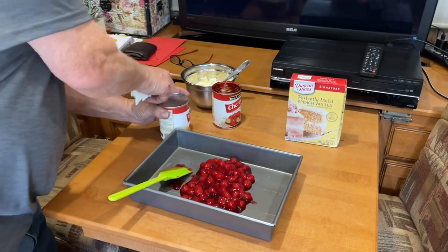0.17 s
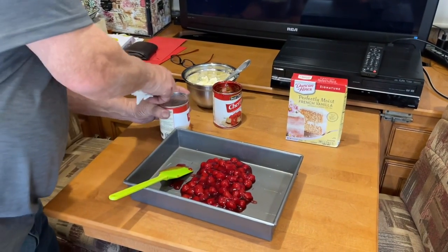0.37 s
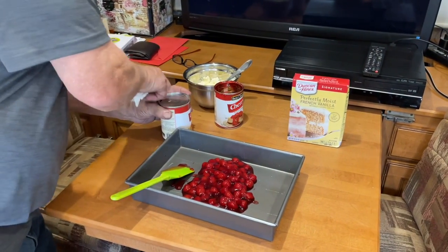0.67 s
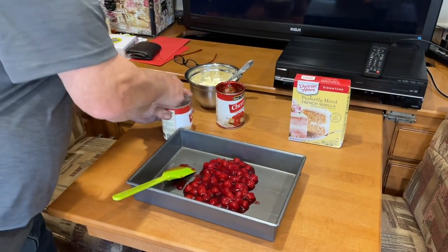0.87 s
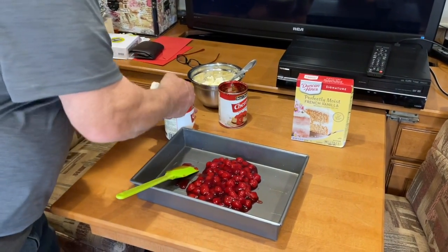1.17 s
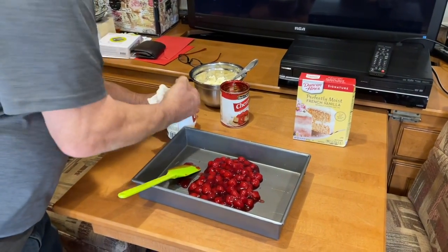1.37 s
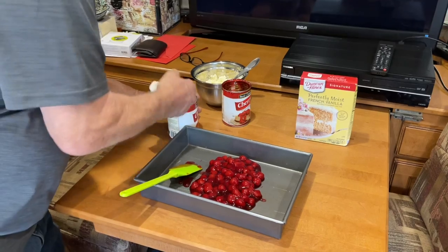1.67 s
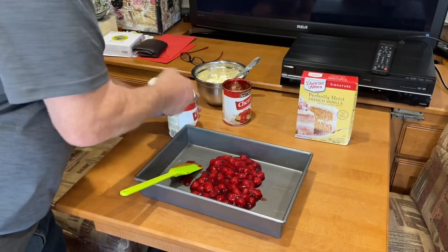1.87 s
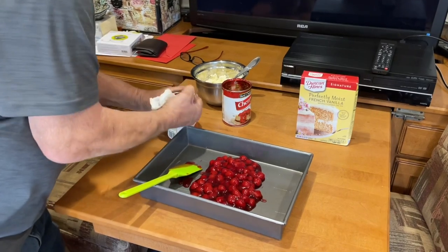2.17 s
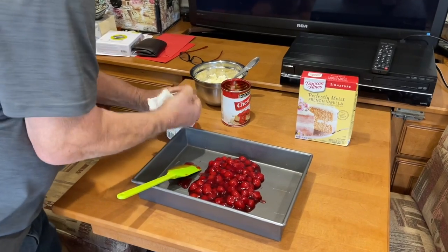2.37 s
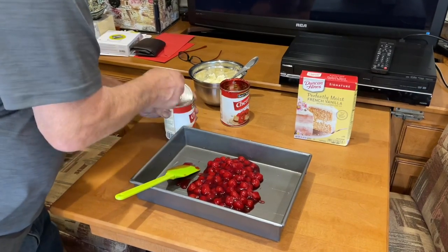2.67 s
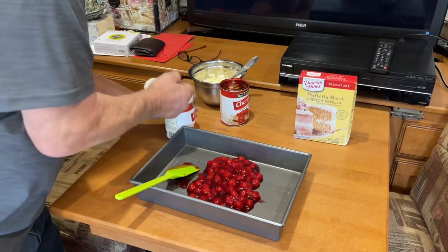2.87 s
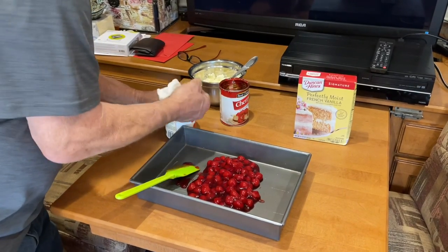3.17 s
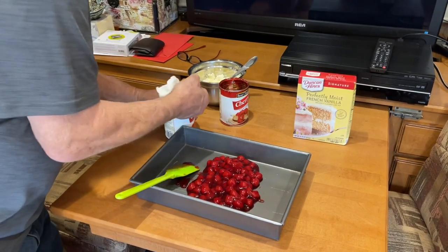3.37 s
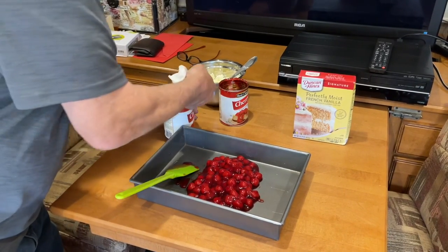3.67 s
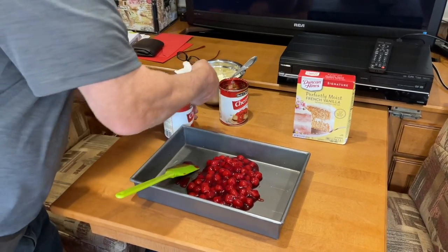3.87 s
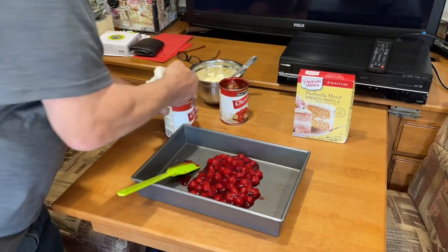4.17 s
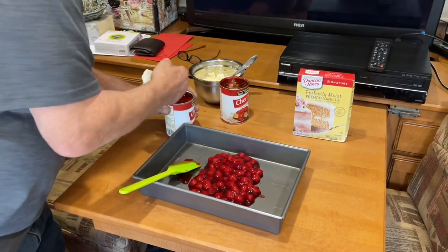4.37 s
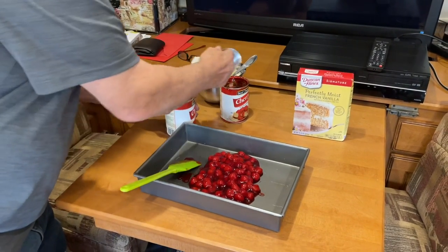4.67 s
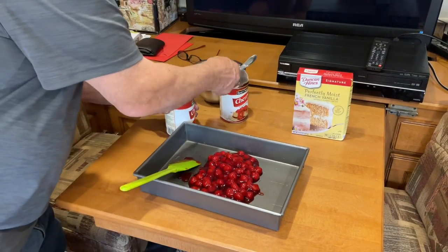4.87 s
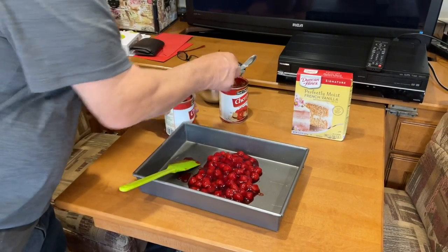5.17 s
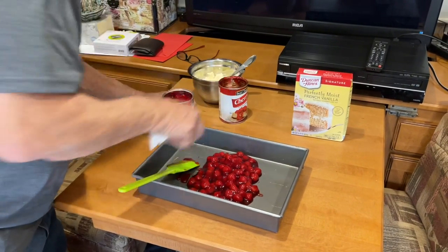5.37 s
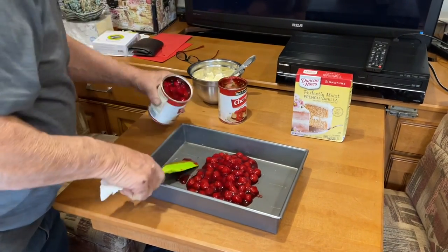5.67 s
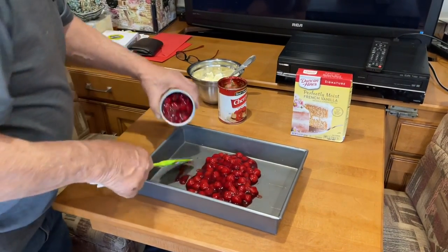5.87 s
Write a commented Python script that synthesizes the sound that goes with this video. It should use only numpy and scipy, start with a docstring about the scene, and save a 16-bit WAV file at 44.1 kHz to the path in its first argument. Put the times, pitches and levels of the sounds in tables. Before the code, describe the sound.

Close tin knocks, rubs and ticks at a wooden table; a lid drops onto another can, with low hum in a quiet kitchen.

```python
"""A quiet kitchen: hands at a wooden table work the lid off a full metal can, close to a pair of microphone ports.
Knocks ring the tin's modes near two touched spots; dense random slips make the rubbing and creaks.
The lid snaps free and drops on another can, then a spatula is lifted from a baking pan; noise bursts add cracks.
Sparse echoes answer the work. Behind lie a slow machine's wavering hum and filtered-noise room tone."""
import sys
import numpy as np
from scipy import signal
from scipy.fft import rfft, irfft, next_fast_len
from scipy.io import wavfile

SR = 44100
rng = np.random.default_rng(int(sys.argv[2]) if len(sys.argv) > 2 else 0)


def invert_db(x):
    """Field ratio 10**(x/20) for x, a level in decibels (scalar or array-like)."""
    u = np.asarray(x, float) / 20
    return 10 ** u


def dump_mix(stems):
    """Bounce the given channels to the path in sys.argv[1] as a 16-bit WAV at rate SR."""
    frames = np.atleast_2d(stems).T  # one column per channel
    limited = np.clip(frames, -1, 1)  # hard clip at full scale
    pcm = np.round(limited * 32767).astype(np.int16)
    wavfile.write(sys.argv[1], SR, pcm)


N = 265923

# can and lid modes: pitch_hz, relative_level_db, t60_s (before the grip shortens it)
TIN_MODES = [(269, 0, .08), (370, -8, .05), (480, -4, .06), (549, -2, .055), (610, 0, .06), (662, 0, .05),
             (750, -3, .06), (885, -3, .07), (1010, -6, .05), (1220, -3, .06), (1290, -4, .07),
             (1410, -2, .06), (1520, -5, .05), (1640, -2, .055), (1950, -4, .05), (2260, -4, .05),
             (2450, -3, .045), (2650, -2, .05), (2900, -4, .05), (3190, -6, .04), (3470, -5, .04),
             (3950, -6, .04), (4200, -5, .04), (4450, -3, .03), (4650, -2, .035), (4850, -4, .03),
             (6340, -4, .05), (7150, -6, .05)]
# spectra: pitch_hz, relative_level_db
TABLE_THUD = [(100, -41.5), (200, -1), (300, 2), (600, 0), (1000, -0.5), (2000, -48.5)]  # table top
GRIT_COLOUR = [(300, -33), (800, -19), (1500, -0.5), (2500, -7), (4000, -14), (7000, -23.5)]  # broad middle of friction
HISS_COLOUR = [(1500, -20.5), (3500, 17), (6500, 18), (9000, -2), (12000, 7.5)]  # fine top of friction
CRACK_COLOUR = [(1000, -2), (2500, -1.5), (4500, 1.5), (7000, -2), (9000, -1), (12000, 2)]  # sharp part of knocks, and ticks
PAPER_COLOUR = [(2000, -10), (5000, -6), (7500, -8), (9000, -3.5), (12000, -2)]  # paper towel

# knocks of can, lid and spatula: time_s, strength_db (relative), high_over_low_ring_db, low_spot_hz, high_spot_hz
KNOCKS = [(0.001, -44, 4, 454, 1860), (0.049, -53.5, 7, 480, 1940), (0.335, -46, -0.5, 880, 2200),
          (0.348, -28, -6, 1004, 1420), (0.553, -33.5, -3, 580, 1620), (0.894, -45, 8.5, 832, 2240),
          (0.918, -36.5, 2, 750, 1380), (1.432, -65.5, 22.5, 710, 2260), (1.546, -72.5, 14.5, 800, 2430),
          (1.62, -65, -10, 990, 1400), (1.655, -62, -16, 990, 1400), (1.759, -77, 9, 800, 1400),
          (1.867, -35, -1, 472, 2900), (1.872, -40, 5.5, 480, 1250), (1.948, -30, -7, 437, 1290),
          (1.968, -28, -33, 390, 1300), (1.985, -41, 1, 494, 1350), (2.033, -37.5, -16, 504, 1220),
          (2.186, -54, 2.5, 510, 1370), (2.228, -39.5, -7.5, 500, 1280), (2.247, -36.5, 2.5, 560, 2900),
          (2.251, -24, -4.5, 586, 1210), (2.38, -42, -13, 600, 1400), (2.439, -43.5, -14, 590, 1400),
          (2.489, -35, -18, 590, 1350), (2.714, -38, -8, 510, 1250), (2.785, -70, 14, 510, 2260),
          (2.918, -30.5, -39, 294, 990), (2.974, -25.5, -7, 680, 1900), (2.995, -30, -5.5, 494, 1200),
          (3.075, -39.5, 3.5, 950, 2920), (3.096, -40.5, 7.5, 970, 2750), (3.109, -41.5, 2, 990, 2750),
          (3.088, -41.5, 6, 1000, 4200), (3.153, -28, -9, 890, 2200), (3.417, -63.5, 6.5, 660, 2400),
          (3.451, -52, 11.5, 910, 1820), (3.488, -40, 2, 1000, 1880), (3.551, -37.5, -7, 604, 1660),
          (3.573, -33.5, -1, 560, 1780), (3.652, -33.5, -9, 506, 1670), (3.681, -41, -8, 557, 1690),
          (3.705, -35, -2, 750, 1310), (3.871, -44.5, 2, 614, 1232), (3.888, -37.5, -1, 600, 2700),
          (3.897, -46, -9, 557, 1640), (4.036, -26.5, 6, 694, 2536), (4.801, -19, -22.5, 474, 1270),
          (4.813, -29.5, 0, 838, 1200), (4.902, -12, -26, 650, 1192), (4.921, -26, 14.5, 603, 4525),
          (4.923, -28, 5, 588, 1680), (4.926, -35, 9, 605, 4700), (4.944, -25, -6.5, 600, 1220),
          (4.958, -17.5, -22.5, 600, 1220), (4.975, -43, -11, 560, 1680), (5.006, -19, -6.5, 783, 1647),
          (5.0415, -20.5, -1, 880, 3190), (5.141, -35.5, -6.5, 705, 4250), (5.172, -56.5, 14, 675, 2030),
          (5.258, -40.5, -8, 475, 1260), (5.403, -21, -26, 690, 1190), (5.411, -16.5, -22.5, 677, 1170),
          (5.557, -37.5, 0, 955, 2450), (5.587, -35, 2.3, 990, 2434), (5.713, -38, -12.5, 465, 1217)]
USUAL_DB = -31  # reference strength of knocks and rubs
LOW_FOCUS_DB, HIGH_FOCUS_DB = 50, 65  # modes lose this per octave away from the knocked spot
DETUNE = 0.012  # standard deviation, as a fraction of pitch
EVEN_CONTACT_MS, LONGER_MS_PER_DB = 2.44, 0.5978  # contact at equal rings; duller blows touch longer
CRACK_DB, CRACK_GROWTH = -13.5, 0.31  # crack peak over high strength at USUAL_DB; extra dB per dB
THUD_DB_PER_OCTAVE = 6  # blows on a higher low spot give more thud
THUD_GROWTH = -0.32  # hard blows put less of their strength into the table, dB per dB
DULL_DB_PER_OCTAVE = -10.5  # a blow's grit fades from an octave above its high spot

# long drag around the lid: time_s, pressure_db, extra_low_ring_db, low_spot_hz, high_spot_hz
DRAG = [(0.885, -84, -9, 700, 1560), (0.896, -45, -40, 740, 1360), (0.92, -33, -58, 700, 1340),
        (0.955, -28, -3, 624, 1385), (0.985, -33.5, 3, 580, 1510), (1.028, -42.5, 1, 645, 1820),
        (1.08, -34.5, 4, 740, 1240), (1.13, -42.5, -0.5, 770, 1500), (1.19, -51.5, 2, 660, 1390),
        (1.23, -44, -3, 740, 1510), (1.26, -39, -2, 810, 1490), (1.28, -39.5, 4.5, 894, 1380),
        (1.31, -39.5, 0.5, 800, 1410), (1.328, -44.5, -2, 830, 2480), (1.35, -59, 10.5, 760, 2120),
        (1.39, -59.5, 0, 770, 2370), (1.444, -69, 7, 700, 2240), (1.5, -72, -12, 590, 1940)]
# short rubs on the tin: start_s, hold_s, pressure_db, low_spot_hz, high_spot_hz
RUBS = [(0.029, 0.026, -40.5, 348, 1760), (0.344, 0.042, -57.5, 770, 1296), (1.844, 0.11, -56, 422, 1334),
        (2.684, 0.065, -61.5, 533, 1270), (2.926, 0.04, -61, 320, 990), (2.979, 0.013, -43.5, 526, 1540),
        (3.057, 0.08, -45, 940, 3000), (3.444, 0.125, -50.5, 1250, 1990), (3.65, 0.063, -51.5, 580, 1320),
        (3.77, 0.029, -62, 604, 1520), (3.828, 0.043, -55.5, 600, 1000), (3.869, 0.03, -46, 567, 1640),
        (4.022, 0.028, -51.5, 697, 2520), (4.843, 0.034, -53.5, 630, 1630), (4.894, 0.043, -50, 619, 1560),
        (5.042, 0.1, -50, 626, 1593), (5.378, 0.051, -59, 613, 1259), (5.549, 0.065, -59.5, 792, 1753),
        (5.896, 0.06, -72, 600, 2580)]
# faint fumbling of the hands throughout: time_s, pressure_db
FUMBLE = [(0, -58.5), (0.14, -60), (0.3, -80), (0.62, -70.5), (0.87, -61.5), (1.6, -78.5), (1.8, -73.5),
          (2.15, -68), (2.6, -78.5), (2.9, -62), (3.28, -99), (3.4, -83), (4.0, -76.5), (4.2, -90.5),
          (4.6, -108), (4.8, -79.5), (5.3, -71), (5.5, -68.5), (5.7, -73.5), (6.03, -76)]
# rustles of the paper towel: start_s, hold_s, level_db
RUSTLES = [(0.032, 0.0035, -29.5), (0.213, 0.028, -62), (1.875, 0.014, -50), (2.068, 0.025, -63),
           (2.618, 0.022, -67), (2.77, 0.021, -59.5), (2.815, 0.17, -87), (2.98, 0.019, -49),
           (3.321, 0.029, -66.5), (4.641, 0.059, -67), (4.944, 0.17, -41), (5.142, 0.017, -39.5),
           (5.257, 0.35, -63.5), (5.729, 0.045, -63), (5.92, 0.055, -63)]
FUMBLE_WOBBLE_DB = 2  # rms; the faint handling comes and goes
RISE_DB_PER_S, FALL_DB_PER_S = 1505, 304.5  # rubs and rustles
LOW_DB, LOW_GROWTH = -3.5, 0.83  # low ring strength over USUAL_DB, and dB per dB of pressure
HISS_DB, HISS_GROWTH = -10, 1.9  # the same for hiss
# the long drag has less rumble and hiss than the short rubs, a trace more grit and more tone
DRAG_RUMBLE_DB, DRAG_GRIT_DB, DRAG_HISS_DB, DRAG_TONE_DB = -6.5, 0.5, -16.5, 14

# bright cracks of the knocks, and a few lone ticks: time_s, relative_level_db, tilt_db_per_octave
TICKS = [(0.051, -16.5, 8), (0.347, -45, 2), (0.397, -51, 19), (0.5513, -47.5, 0.5), (0.893, -34.5, -3.5),
         (0.915, -27, 14), (1.259, -38, 15), (1.8663, -35.5, -5), (1.942, -36, 4), (1.986, -44, -9),
         (2.0326, -54, 5), (2.2481, -32, -6), (2.7767, -53, 9), (2.976, -39.5, -6.5), (3.0742, -38.5, -7.5),
         (3.083, -43, 0.5), (3.1608, -37.5, 0), (3.4511, -44.5, -7.5), (3.491, -36, -5),
         (3.5228, -38, -6.5), (3.549, -40.5, -6), (3.5742, -42.5, 0.5), (3.651, -41.5, -8.5),
         (3.683, -51, -12), (3.846, -47, 20), (3.881, -39, -11.5), (4.0362, -15.5, 3.5), (4.8, -40.5, -5),
         (4.9225, -14, 2.5), (5.011, -31, -9.5), (5.0393, -11.5, -4.5), (5.1366, -33, 7), (5.557, -49, -1),
         (5.587, -41.5, -6)]
TICK_MS, TICK_DB = 4.2, 7.5  # decay constant; gain on every one

# the can tips back onto the table: time_s, level_db
CAN_TIPS = [(.794, -22.5), (1.9435, -35), (2.975, -31)]
# the can's base: pitch_hz, relative_level_db, t60_s
CAN_BASE = [(259, -4, 0.081), (557, 6, 0.026), (740, -13, 0.068)]
# the lid lands flat on the other can; a faint repeat follows: time_s, level_db
LID_DROPS = [(5.0405, -5.5), (5.078, -28.5)]
# the can it lands on: pitch_hz, relative_level_db, t60_s
OTHER_CAN = [(269, -16, .06), (487.4, -8.5, 0.054), (646.6, 1.5, 0.02), (880, -18, 0.042),
             (1220, -12, 0.026), (1640, -7, 0.052), (1876, -19, .06)]

# kitchen echoes: pitch_hz, t60_s
ECHO_T60 = [(250, 0.1), (700, 0.15), (2000, 0.15), (5000, 0.18), (11000, 0.17)]
# width of the echoes: pitch_hz, side_over_mid (factor)
ECHO_WIDTH = [(100, 0.33), (600, 0.28), (1500, 1), (5000, 0.77), (7500, 0.69), (8600, .15)]

HUM_HZ, DRONE_HZ = 20.82, 67.8  # mean pitches
# machine hum: multiple of HUM_HZ, level_db (rms)
HUM_ORDERS = [(1, -66.5), (2, -50.5), (3, -60.5), (4, -54.5), (5, -59), (6, -59), (8, -71)]
DRONE_DB = -54.5  # rms; a second, looser tone

# room tone spectrum: pitch_hz, relative_level_db (per Hz)
AIR_COLOUR = [(30, -26.5), (48, -14.5), (62, -8), (110, -13.5), (173, -14.5), (474, -28.5), (1690, -43),
              (2300, -53.5), (8660, -55.5), (11300, -55.5), (12500, -75.5)]
AIR_DB = -56.5  # rms over both sides
# room tone: pitch_hz, left_right_likeness (0 to 1)
AIR_LIKENESS = [(60, 0.38), (250, 0.83), (700, 0.35), (1500, 0.09), (3000, 0.4), (7500, 0.17), (8600, 0.23)]

# the ports turn against each other in the treble, by one and a half cycles: pitch_hz, left_lead_radians
PORT_PHASE = [(0, 0), (1700, .05), (3100, 1), (4500, .5), (7900, .7), (8600, 0), (9300, -1.5),
              (10150, -3.14), (11370, -5.2), (12050, -6.28), (12500, -6.5), (13000, -7.8), (13300, -9.4)]
# steep treble cut of the finished sound, above 12 kHz: pitch_hz, level_db
TREBLE_CUT = [(11500, -1), (12700, -28), (13600, -31), (16000, -36.5)]


def knocks():
    """Each blow swings up the tin's modes near a low and a high spot; its rattling contact adds grit, thud and crack."""
    s, low_db, edge_db, low_hz, high_hz = np.transpose(KNOCKS)
    high_db = low_db + edge_db
    crack_db = high_db + CRACK_DB + CRACK_GROWTH * (high_db - USUAL_DB)
    crack_db += 0.3 * np.minimum(edge_db, 0)  # dull blows crack less
    thud_db = low_db - 9.5 + THUD_DB_PER_OCTAVE * np.log2(low_hz / 500)
    thud_db += THUD_GROWTH * (low_db - USUAL_DB)
    contact_ms = np.maximum(EVEN_CONTACT_MS - LONGER_MS_PER_DB * np.clip(edge_db, -12, 12), 1)

    t = np.arange(3200) / SR
    hz, _, t60 = np.transpose(TIN_MODES)[:, :, None]
    fade = invert_db(-60 * t / (0.65 * t60))  # the grip damps the rings
    mode_size = invert_db(low_db + 5.0) * shares(low_hz, LOW_FOCUS_DB)
    mode_size += invert_db(high_db + 4.0) * shares(high_hz, HIGH_FOCUS_DB)

    out = np.zeros(N + len(t))
    for k, at in enumerate(np.round(np.maximum(s - 0.001, 0) * SR).astype(int)):
        u = t / contact_ms[k] * 1000  # time in lengths of the contact
        # the grip detunes and weights the modes a little differently at every blow
        weight_db, bend = rng.standard_normal((2, len(hz)))
        modes = fade * np.sin(2 * np.pi * hz * (1 + DETUNE * bend[:, None]) * t)
        ring = (mode_size[:, k] * invert_db(weight_db)) @ modes
        ring *= 1 - np.exp(-(1.3 * u) ** 1.8)  # the modes gather energy while the contact lasts
        out[at:at + len(t)] += ring

        contact = np.sqrt(u) * np.exp(-u) * rng.standard_normal(len(t))
        grit = [(f, db + DULL_DB_PER_OCTAVE * max(np.log2(f / high_hz[k] / 2), 0)) for f, db in GRIT_COLOUR]
        noises = (grit, high_db[k] - 3.5), (TABLE_THUD, thud_db[k]), (CRACK_COLOUR, crack_db[k])
        for colour, peak_db in noises:
            noise = coloured(contact, colour)
            out[at:at + len(t)] += invert_db(peak_db) * noise / abs(noise).max()
    return out[:N]


def rubbing():
    """Dense uneven slips ring modes near two moving spots, and add two sliding tones, grit, rumble and hiss."""
    t = np.arange(N) / SR
    coarse = t[::64]

    def fine(curve):
        """A coarse curve at every sample."""
        return np.interp(t, coarse, curve)

    # pressures of the drag, the rubs and the fumbling add as powers
    drag_s, drag_pressure_db, drag_low_db = np.transpose(DRAG)[:3]
    drag_db = np.interp(coarse, drag_s, drag_pressure_db, left=-150, right=-150)
    rub_db = strokes(coarse, *np.transpose(RUBS)[:3])
    fumble_db = np.interp(coarse, *np.transpose(FUMBLE)) + FUMBLE_WOBBLE_DB * wander(3.3, 2.0)
    high_db = 10 * np.log10(invert_db(2 * drag_db) + invert_db(2 * rub_db) + invert_db(2 * fumble_db))
    dragging = invert_db(2 * (drag_db - high_db))  # the drag's share of the pressure
    low_db = USUAL_DB + LOW_DB + LOW_GROWTH * (high_db - USUAL_DB)
    low_db += np.interp(coarse, drag_s, drag_low_db, left=0, right=0)
    hiss_db = USUAL_DB + HISS_DB + HISS_GROWTH * (high_db - USUAL_DB) + DRAG_HISS_DB * dragging
    rustle_db = strokes(coarse, *np.transpose(RUSTLES))

    spots = sorted((row[0], *row[-2:]) for row in DRAG + RUBS)
    s, low_hz, high_hz = np.transpose(spots)
    low_hz, high_hz = np.interp(coarse, s, low_hz), np.interp(coarse, s, high_hz)

    # about 9000 slips a second, of uneven size and random sign
    size = invert_db(2.6 * np.minimum(rng.exponential(1, N), 4)) * rng.choice([-1., 1.], N)
    slips = evened(size * (rng.random(N) < 9000 / SR))

    out = np.zeros(N)
    drive = invert_db(low_db - 15.5) * shares(low_hz, 39.0) + invert_db(high_db - 10.5) * shares(high_hz, 14.65)
    for (hz, _, t60), share in zip(TIN_MODES, drive):
        r = 1000 ** (-1 / (0.7 * t60 * SR))  # the grip damps the rings
        w = 2 * np.pi * hz / SR
        push = slips * fine(share * invert_db(4.5 * wander(34, 5.5)))
        out += signal.lfilter([np.sqrt(2 * (1 - r ** 4)) * np.sin(w)], [1, -2 * r * np.cos(w), r * r], push)

    # the bending lid's own sliding tones
    for hz, db, width_hz in (low_hz, low_db + 7.0, 160), (high_hz, high_db + 3.5, 360):
        tone_db = db + DRAG_TONE_DB * dragging + 0.78 * wander(50, 36)
        out += resonate(slips * fine(invert_db(tone_db)), fine(hz), width_hz)

    noises = ((GRIT_COLOUR, high_db + 10.0 + DRAG_GRIT_DB * dragging),
              (TABLE_THUD, low_db + 12.0 + DRAG_RUMBLE_DB * dragging),
              (HISS_COLOUR, hiss_db), (PAPER_COLOUR, rustle_db))
    for colour, db in noises:
        out += coloured(slips * fine(invert_db(db + 2.5 * wander(120, 20))), colour)
    return out


def ticks():
    """Bright cracks of the knocks and a few lone ticks: very short rattles, some sharper than others."""
    u = np.arange(1500) / SR / TICK_MS * 1000
    out = np.zeros(N + len(u))
    for s, db, tilt in TICKS:
        colour = [(hz, level + tilt * np.log2(hz / 7000)) for hz, level in CRACK_COLOUR]
        rattle = np.sqrt(u) * np.exp(-u) * rng.standard_normal(len(u))
        tick = coloured(rattle, colour)
        at = round((s - 0.0005) * SR)
        out[at:at + len(u)] += invert_db(db + TICK_DB) * tick / abs(tick).max()
    return out[:N]


def thumps(blows, modes, rise_s, hold_s):
    """Flat landings: a few low rings start together, are fed while the contact holds and then die fast."""
    t = np.arange(4000) / SR
    out = np.zeros(N + len(t))
    since_release = np.maximum(t - hold_s, 0)
    ring = sum(invert_db(db - 60 * since_release / t60) * np.sin(2 * np.pi * hz * t) for hz, db, t60 in modes)
    ring = ring * np.minimum(t / rise_s, 1)
    for s, db in blows:
        out[round(s * SR):][:len(t)] += invert_db(db) * ring
    return out[:N]


def kitchen(x):
    """Sparse echoes of random sign, each band dying at its own speed; three random tails take turns at a steady rate."""
    out = np.zeros((2, N))
    for k in range(3):
        # one echo at a random place in every 20 samples
        taps = np.zeros((2, SR // 2))
        slots = np.arange(120, SR // 2 - 20, 20)
        at = slots + rng.integers(0, 20, (2, len(slots)))
        np.put_along_axis(taps, at, rng.choice([-1., 1.], at.shape), 1)
        hz, t, (mid, side) = signal.stft(taps, SR, nperseg=256)
        width = read(ECHO_WIDTH, hz)[:, None]
        bands = np.array([mid + width * side, mid - width * side]) / np.sqrt(1 + width ** 2)
        fade = invert_db(-60 * t / read(ECHO_T60, hz)[:, None])
        tail = signal.istft(bands * fade, SR, nperseg=256)[1]
        tail = tail / np.linalg.norm(tail[0])
        turn = np.sqrt(2 / 3) * np.cos(2 * np.pi * (3.1 * np.arange(N) / SR + k / 3))  # 3.1 cycles a second
        out += signal.oaconvolve((x * turn)[None], tail, axes=1)[:, :N]
    return out


def hum():
    """Multiples of a slightly wavering shaft speed, each swelling, and one looser tone."""
    def smooth(top_hz):
        """Slow chance at every sample."""
        return np.interp(np.arange(N), np.arange(0, N, 64), wander(top_hz))

    turns = np.cumsum(HUM_HZ * (1 + 0.0034 * smooth(2.7))) / SR
    orders = np.zeros(N)
    for k, db in HUM_ORDERS:
        swell_db = 0.47 * k * smooth(10.0)  # higher multiples swell more
        orders += invert_db(db + swell_db) * np.sin(2 * np.pi * (k * turns + rng.random()))
    drone_turns = np.cumsum(DRONE_HZ * (1 + 0.012 * smooth(1.7))) / SR
    drone = invert_db(DRONE_DB + 2 * smooth(4.3)) * np.sin(2 * np.pi * drone_turns)
    return np.sqrt(2) * (orders + drone)  # rms levels to peaks


def air():
    """Room tone: random short-time spectra, partly shared by both sides."""
    hz = np.fft.rfftfreq(2048, 1 / SR)
    a, b, c, d = rng.standard_normal((N // 512 + 5, 1025, 4)).T
    same = np.clip(read(AIR_LIKENESS, hz), -1, 1)[:, None]
    left, other = a + 1j * b, c + 1j * d
    right = same * left + np.sqrt(1 - same ** 2) * other
    spectra = np.array([left, right]) * invert_db(read(AIR_COLOUR, hz))[:, None]
    return invert_db(AIR_DB) * evened(signal.istft(spectra, nperseg=2048, noverlap=1536)[1][:, :N])


def shares(centre_hz, db_per_octave):
    """Modes far from the touched spot's own pitch ring less; the squares sum to 1."""
    hz, db, _ = np.transpose(TIN_MODES)[:, :, None]
    near = invert_db(db - db_per_octave * abs(np.log2(hz / centre_hz)))
    return near / np.linalg.norm(near, axis=0)


def strokes(t, start, hold, db):
    """Level in dB of strokes that rise fast, hold and die away; their powers add."""
    since = t - start[:, None]
    rise_db = RISE_DB_PER_S * (since - 0.015)
    fall_db = FALL_DB_PER_S * (hold[:, None] - since)
    shape_db = np.minimum(rise_db, np.minimum(0, fall_db))
    return 10 * np.log10(np.sum(invert_db(2 * np.maximum(db[:, None] + shape_db, -150)), axis=0))


def resonate(x, hz, width_hz):
    """A resonance that follows the curve hz: shift down to zero, smooth twice, shift back."""
    turn = np.exp(2j * np.pi * np.cumsum(hz) / SR)
    r = np.exp(-np.pi * width_hz / SR)
    return 2 * (turn * signal.lfilter([(1 - r) ** 2], [1, -2 * r, r * r], x / turn)).real


def wander(top_hz, low_hz=0.13):
    """Chance of rms 1 that drifts at rates between low_hz and top_hz, one value every 64 samples."""
    t = np.arange(0, N, 64) / SR
    rates = np.geomspace(low_hz, top_hz, 16)
    return evened(sum(np.sin(2 * np.pi * (f * t + rng.random())) / np.sqrt(f) for f in rates))


def coloured(x, points):
    """Causal (minimum-phase) filter with the given spectrum."""
    log_gain = np.log(invert_db(read(points, abs(np.fft.fftfreq(2048, 1 / SR)))))
    response = np.exp(np.conj(signal.hilbert(log_gain)))
    return signal.oaconvolve(x, np.fft.ifft(response).real[:1024])[:len(x)]


def read(points, hz):
    """Looks a spectrum up on a log frequency axis."""
    f, value = np.transpose(points)
    return np.interp(np.log(hz + 1), np.log(f + 1), value)


def evened(x):
    """Scales to rms 1."""
    return x / np.sqrt(np.mean(x ** 2) + 1e-20)


def scene():
    """Table work a little left of centre, its echoes, the hum and the room tone."""
    tipping = thumps(CAN_TIPS, CAN_BASE, rise_s=0.0024, hold_s=0)
    landing = thumps(LID_DROPS, OTHER_CAN, rise_s=0.0028, hold_s=0.0071)
    work = knocks() + tipping + landing + ticks() + rubbing()
    near = work * invert_db([[-2.5], [-3.5]])  # left, right
    echoes = invert_db(-7.5) * kitchen(work)
    return near + echoes + hum() * invert_db([[0.2], [-0.2]]) + air()


def roll_off(x):
    """The treble ends steeply here."""
    return signal.sosfilt(signal.butter(12, 15960, fs=SR, output="sos"), x)


def record(dry):
    """The close pair of ports shift in phase against each other; a steep treble cut lies above 12 kHz."""
    size = next_fast_len(N + 4096)
    hz = np.fft.rfftfreq(size, 1 / SR)
    turn = np.exp(0.5j * read(PORT_PHASE, hz))  # half the lead to each port
    spectra = rfft(dry, size) * invert_db(read(TREBLE_CUT, hz)) * np.array([turn, 1 / turn])
    ports = irfft(spectra, size)[:, :N]
    return roll_off(ports)


dry = scene()
out = record(dry)
dump_mix(out)
```